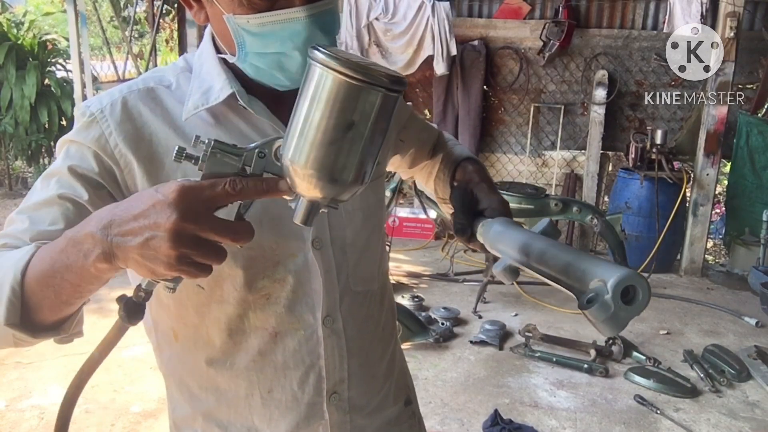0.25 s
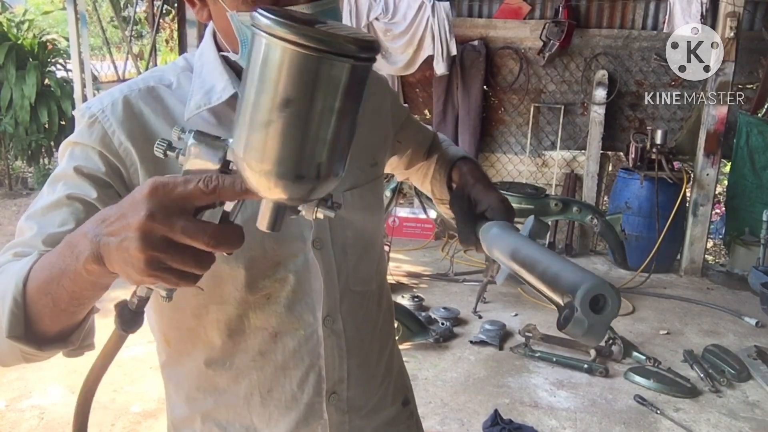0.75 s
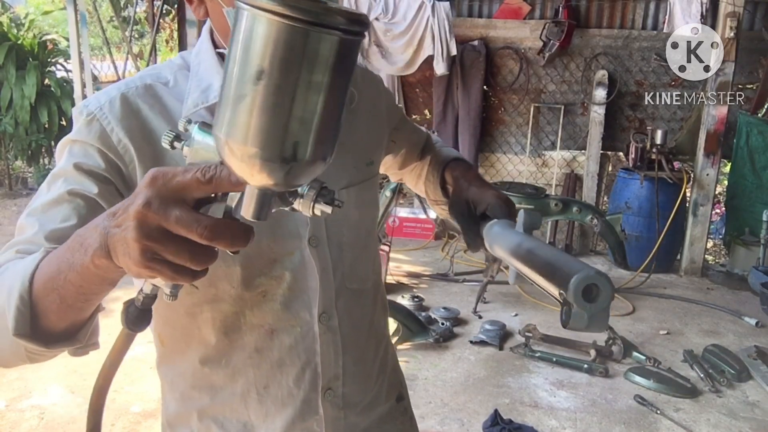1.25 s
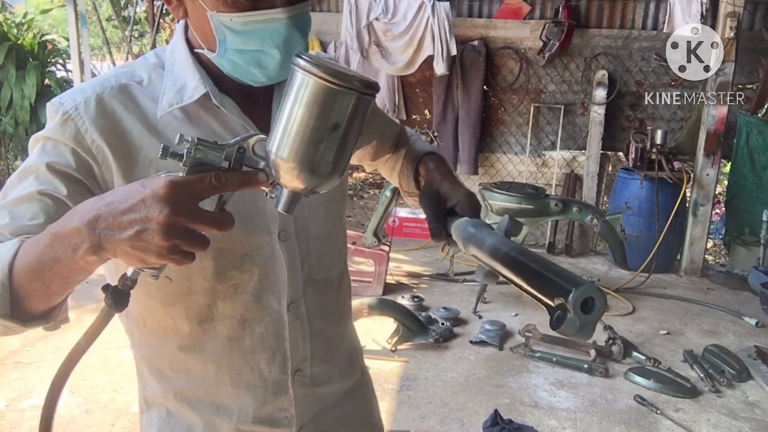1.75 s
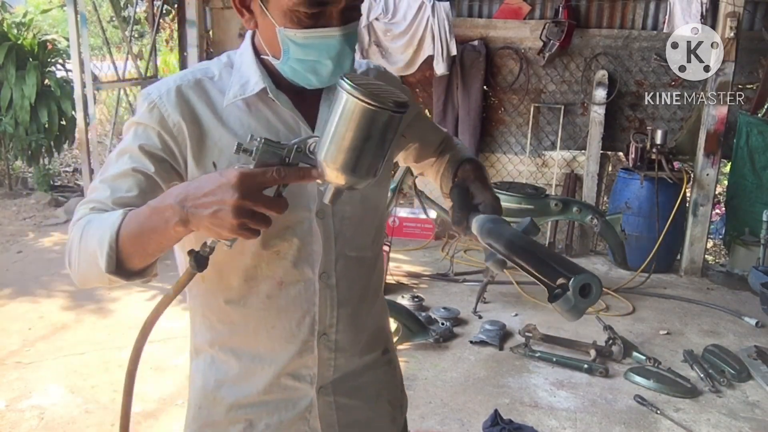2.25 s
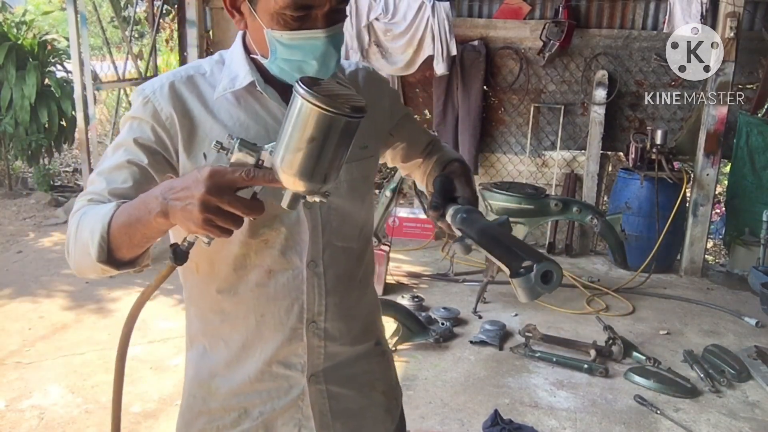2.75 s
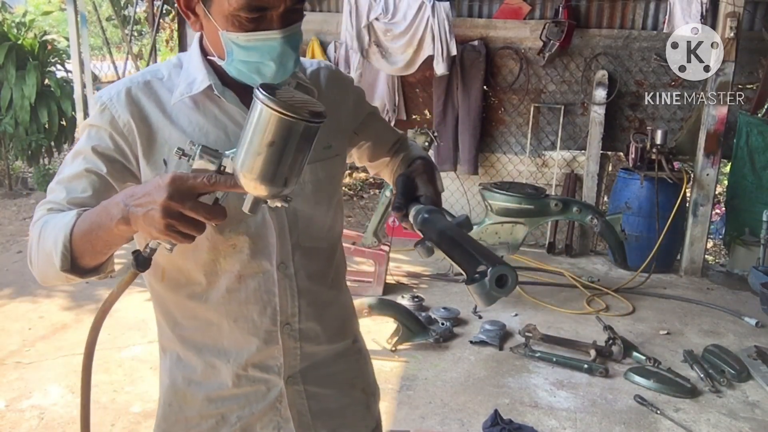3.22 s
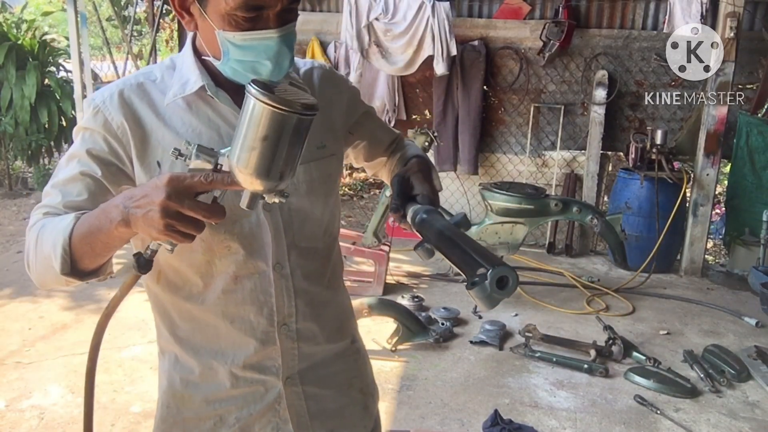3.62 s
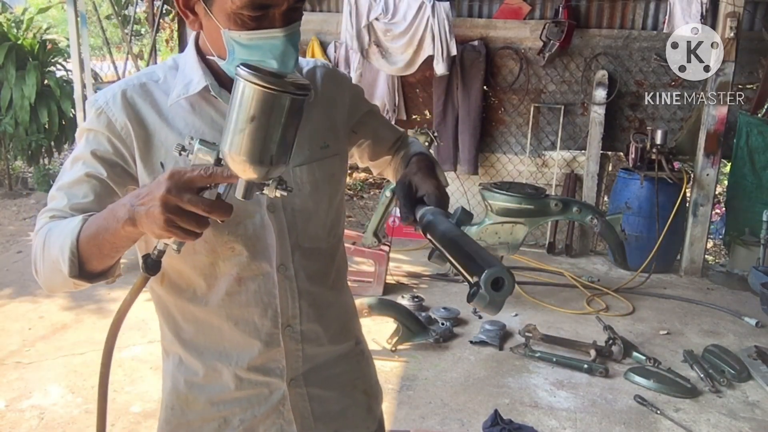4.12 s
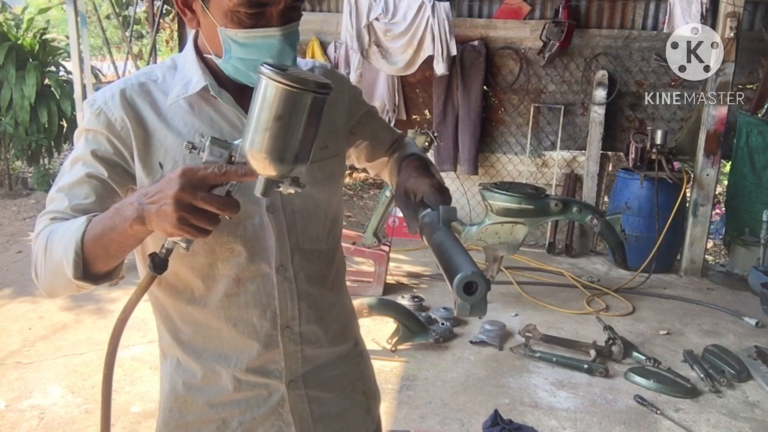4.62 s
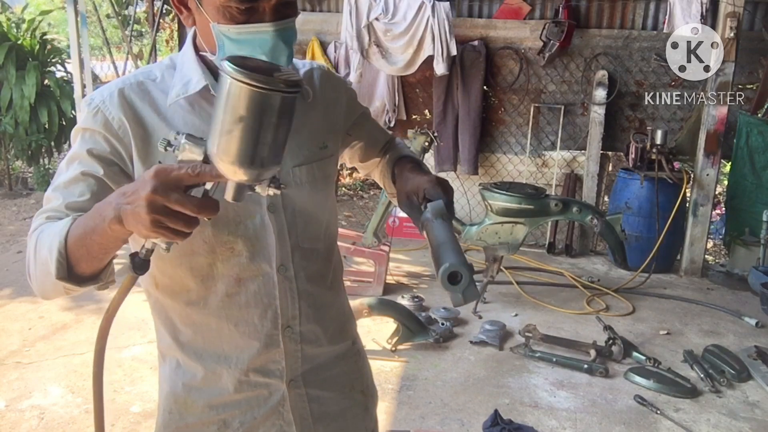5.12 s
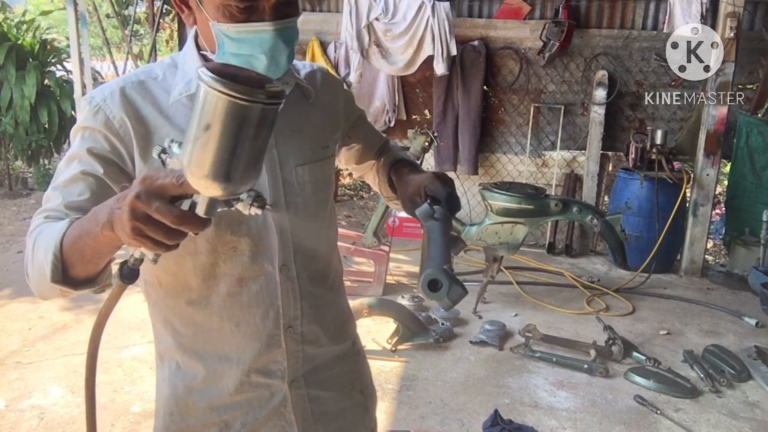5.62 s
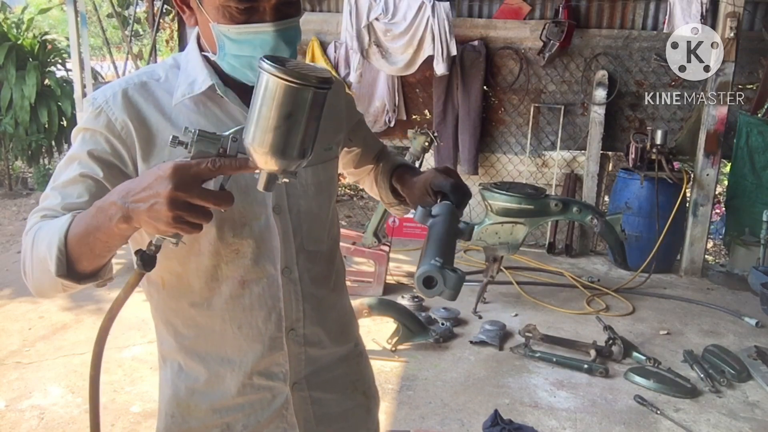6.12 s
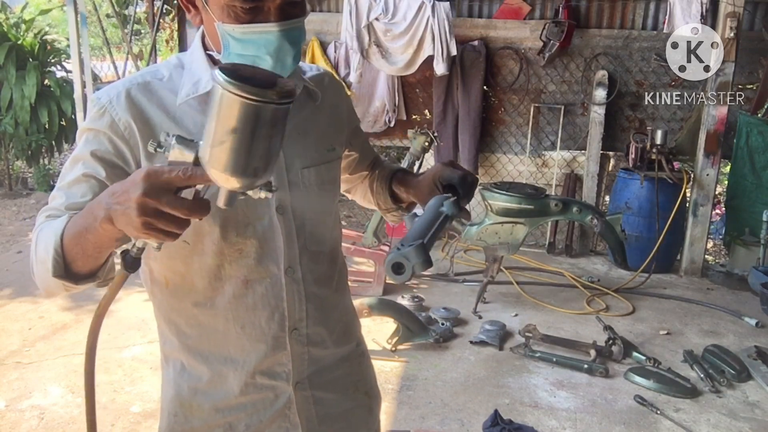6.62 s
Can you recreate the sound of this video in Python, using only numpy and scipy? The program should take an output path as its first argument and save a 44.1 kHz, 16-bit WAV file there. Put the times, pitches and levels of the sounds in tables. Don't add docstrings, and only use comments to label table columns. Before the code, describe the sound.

From 0 to nearly 7 seconds a spray gun blows continuously at arm's length in an open shed: a bright, dense hiss with fine sizzle on top and a coarser roar as the air strikes a metal tube. It is nearest and loudest in the first 1.5 seconds, swelling around 0.6 and 1.2, then eases down by about 2.3 and stays fairly even, with a slight lift near 4.8. Every 0.3 to 0.5 seconds the wrist turns: the top dims gradually and returns quickly, while a lower rush swells. Behind, a piston compressor chugs steadily, about eleven turns a second, each a cluster of uneven hollow knocks ringing pipe, tank and roof. Low mains hum and a wavering belt-guard buzz lie beneath, the buzz jumping near 2.6 and 4.4. Soft gusts thump the microphone, notably at the start, 4.5 and 5.2. It ends still spraying.

```python
import sys
import numpy as np
from scipy import signal
from scipy.fft import rfft, irfft, next_fast_len
from scipy.io import wavfile
from scipy.ndimage import uniform_filter1d

SR = 44100
rng = np.random.default_rng(int(sys.argv[2]) if len(sys.argv) > 2 else 0)


def store_pcm(level_fs):
    pcm = np.round(np.clip(level_fs, -1, 1) * 32767).astype(np.int16)
    wavfile.write(sys.argv[1], SR, np.atleast_2d(pcm).T)


def volts_from_db(level):
    exponent = np.asarray(level, float) / 20
    return 10 ** exponent


N = 302967

# (frequency [Hz], level [dB per Hz])
SHED_COLOUR = [(25, -36), (34, -24), (40, -13), (85, -9), (112, -12.5), (170, -6.5), (255, -14),
               (385, -8.5), (550, -16), (700, -8), (725, -21.5), (900, -26)]
SHED_DB, BREEZE_DB = -38.5, -40
# (time [s], half length [s], level [dB])
BUFFETS = [(.02, 0.066, -29), (.25, 0.13, -35.5), (.75, 0.29, -35), (1.6, 0.066, -41), (2.22, .12, -35),
           (2.702, 0.14, -40), (3.115, .12, -42), (3.45, .1, -43), (4.06, 0.071, -40), (4.53, 0.084, -31),
           (5.247, 0.057, -30), (5.63, 0.08, -34), (6.03, .1, -37)]

MAINS_HZ, MAINS_DB = 100.5, -50
# (time [s], half length [s], level [dB])
BELT_SLAPS = [(.14, 0.035, -46), (0.265, 0.038, -45), (0.64, .03, -42), (0.997, .04, -45),
              (1.31, 0.034, -48), (1.69, 0.088, -45), (2.0, 0.087, -47.5), (2.354, 0.045, -43),
              (2.578, .04, -38), (2.803, 0.11, -48), (3.05, 0.11, -51), (3.246, 0.037, -40),
              (3.523, 0.072, -40.5), (3.777, 0.089, -43), (3.98, .04, -44), (4.394, 0.032, -34),
              (4.562, 0.034, -43), (4.744, 0.055, -44), (5.06, 0.22, -47), (5.28, .07, -41.5),
              (5.48, 0.025, -41), (5.756, 0.18, -43), (6.06, 0.1, -41), (6.253, 0.061, -50),
              (6.5, .04, -42), (6.678, 0.034, -47), (6.83, 0.026, -40)]
GUARD_HZ, GUARD_WAVER_HZ, GUARD_REST_DB = 157, 0.8, -49

# (time [s], speed [turns per second])
CRANK_SPEED = [(0, 11.139), (2.6, 11.141), (3.4, 11.147), (4.9, 11.146), (5.4, 11.156), (6.87, 11.157)]
# (crank angle [turns], strength [dB])
VALVE_KNOCKS = [
    (.0046, -7.3),
    (.1985, 0),
    (.3854, -5.5),
    (.4000, -5),
    (.6490, -15.2),
    (.7827, -11.8),
]
# (frequency [Hz], width [Hz], level [dB])
PIPE_KNOCK = (318, 25, -31.3)
# (frequency [Hz], width [Hz], level [dB])
PIPE_AIR = (328, 46, -42.5)
# (frequency [Hz], width [Hz], knock level [dB],
# air-flow level [dB])
TANK_AND_ROOF = [(191.7, 7.8, -67.5, -90), (234.5, 12, -50, -54), (261.7, 3.4, -67, -50.5),
                 (367.7, 4.4, -47.5, -62), (416, 53, -48.5, -53.5), (517.3, 7.4, -64, -58.5),
                 (675.1, 7.9, -57, -52.5), (685.5, 7.7, -51, -54.5), (701.6, 4, -52, -57),
                 (311.4, 1.5, -78, -51), (622, 26, -56.5, -73), (1060, 9.6, -58, -58)]

# (frequency [Hz], level [dB per Hz])
JET_COLOUR = [(450, -34), (760, -19.5), (977, -12.5), (1040, -11.5), (2100, -6.5), (2910, 1), (4390, 2),
              (4860, -1.5), (5440, 0.5), (6650, 1.5), (7530, -1), (9210, 2), (10400, 2), (12300, 4.5),
              (15200, 2.5)]
# (frequency [Hz], width [Hz], depth [dB])
SHADOWS = [(3670, 750, -2.5), (4860, 190, -2.5), (6080, 290, -3), (7500, 600, -0.5), (10400, 360, -3.5)]
BAND_EDGES = [2150, 7300, 10500]
# (time [s], level [dB])
NEARNESS = [(0.0, -21.0), (0.28, -23.5), (0.57, -20.5), (1.04, -24), (1.22, -20.5), (1.55, -22),
            (1.84, -24.5), (1.9, -23), (2.29, -25), (2.67, -24), (3.03, -25.5), (3.85, -25), (4.35, -25.5),
            (4.75, -24.5), (4.95, -25), (5.55, -25), (6.43, -25.5), (6.87, -25.5)]
# (time [s], half length [s], hiss dimming [dB], sizzle dimming [dB])
WRIST_TURNS = [(0.123, 0.15, 7, 3), (0.5, 0.17, 6, 1.5), (0.889, 0.13, 7.5, 2), (1.216, 0.154, 6.5, 1),
               (1.68, 0.17, 8.5, 5.5), (2.28, 0.133, 6.5, 3.5), (2.536, 0.21, 4.3, 2.5), (2.91, 0.1, 8, 4),
               (3.379, 0.086, 8, 3), (3.82, 0.1, 8.5, 2.5), (4.046, 0.12, 3.5, 1), (4.394, 0.075, 7, 4.0),
               (4.76, 0.23, 5, 2), (4.95, 0.09, 7.5, -1), (5.284, 0.13, 6.5, 4.0), (5.62, 0.17, 7, 1.5),
               (6.032, 0.13, 6.5, 3.5), (6.36, 0.17, 6, 1), (6.753, 0.11, 7.5, 2)]
ARM_LENGTH_ROAR_DB = -25.5
HISS_DB, SIZZLE_DB, RUSH_DB = -30, -25, -39.5
HISS_FOLLOWS, SIZZLE_FOLLOWS, RUSH_FOLLOWS = 0.76, 0.77, 0.63
RUSH_PER_TURN, ROAR_PER_TURN = 0.31, 0.39
FLICK_BACK = 0.54

# (centre time [s], low edge [Hz])
STEREO_PATCHES = [(.253, 14500), (.3, 7600), (.3, 13900), (.416, 9900), (.695, 8300), (.695, 12000),
                  (.718, 6900), (1.345, 14200), (.88, 5000), (.95, 4200), (1.182, 4100), (1.345, 4300),
                  (1.345, 8300), (1.856, 6900), (1.925, 6200), (2.273, 4100), (2.273, 7600), (2.413, 5000),
                  (2.738, 8200), (2.924, 7900), (2.924, 11000), (3.597, 8100), (3.922, 6200), (4.038, 6500),
                  (4.061, 11800), (4.224, 7600), (4.549, 11700), (5.13, 10600), (4.073, 14200),
                  (5.64, 7900)]
PATCH_WIDTH_HZ, TOP_HZ = 1700, 15720


def level(x, db):
    return x * volts_from_db(db) / np.sqrt(np.mean(x ** 2))


def curve(rows):
    s, *columns = np.transpose(rows)
    return [np.interp(np.arange(N) / SR, s, c) for c in columns]


def shaped(x, gain):
    size = next_fast_len(N + SR)
    hz = np.arange(1, size // 2 + 2) * SR / size
    return irfft(rfft(x, size) * gain(hz), size)[:N]


def colour(points, hz):
    f, db = np.transpose(points)
    return volts_from_db(np.interp(np.log(hz), np.log(f), db, left=-80, right=db[-1]))


def ring(hz, centre_hz, width_hz):
    return (1 + 1j * (hz / centre_hz - centre_hz / hz) * centre_hz / width_hz) ** -2


def rung(x, centre_hz, width_hz, db):
    return level(shaped(x, lambda hz: ring(hz, centre_hz, width_hz)), db)


def walk(rate):
    hold = int(SR / rate)
    steps = rng.standard_normal(N // 200)[:N // hold + 1]
    wander = np.repeat(steps, hold)
    wander = uniform_filter1d(uniform_filter1d(wander, hold), hold)[:N]
    return wander / wander.std()


def swells(s, half_s, size, back=1):
    t = np.arange(0, N + 64, 64) / SR
    since = t - s[:, None]
    side = np.where(since > 0, back, 1)
    bells = np.exp(-(since / half_s[:, None] / side) ** 2)
    return np.interp(np.arange(N) / SR, t, size @ bells)


def shed():
    rumble = shaped(rng.standard_normal(N), lambda hz: colour(SHED_COLOUR, hz))
    wind = shaped(rng.standard_normal(N), lambda hz: ring(hz, 87, 103) / (1 + (42 / hz) ** 12))
    s, half_s, db = np.transpose(BUFFETS)
    gusts = volts_from_db(BREEZE_DB) + swells(s, half_s, volts_from_db(db))
    return level(rumble, SHED_DB) * volts_from_db(0.5 * walk(3.03)) + level(wind, -10.5) * gusts


def motor():
    s, half_s, db = np.transpose(BELT_SLAPS)
    buzz = volts_from_db(GUARD_REST_DB) + swells(s, half_s, volts_from_db(db))
    hum = np.sin(2 * np.pi * MAINS_HZ * np.arange(N) / SR) * volts_from_db(MAINS_DB + 0.56 * walk(2.5))
    guard_hz = GUARD_HZ + GUARD_WAVER_HZ * walk(6.5)
    guard = np.sin(2 * np.pi * np.cumsum(guard_hz) / SR) * buzz * volts_from_db(walk(4))
    return np.sqrt(2) * (hum + guard)


def valve_knocks():
    turn = 0.01 + np.cumsum(curve(CRANK_SPEED)[0]) / SR
    angle, db = np.transpose(VALVE_KNOCKS)
    whole = np.arange(int(turn[-1]) + 1)[:, None]
    jitter_s, jitter_db = 0.00004 * rng.standard_normal((2, len(whole), len(angle)))
    jitter_db = jitter_db / 0.00004 * 0.8
    at = np.interp(whole + angle, turn, np.arange(N)) + jitter_s * SR
    strength = volts_from_db(db + jitter_db) * (whole + angle < turn[-1])
    knocks = np.zeros(N)
    np.add.at(knocks, np.clip(at, 0, N - 1).astype(int), strength)
    return knocks * volts_from_db(0.7 * walk(3))


def compressor():
    knocks = valve_knocks()
    swell = signal.lfilter([1], [1, -np.exp(-1 / (0.012 * SR))], knocks)
    flow = rng.standard_normal(N) * (1 + 0.5 * swell / swell.mean())
    sound = rung(knocks, *PIPE_KNOCK) + rung(flow, *PIPE_AIR)
    for hz, width_hz, knock_db, flow_db in TANK_AND_ROOF:
        sound += rung(knocks, hz, width_hz, knock_db) + rung(flow, hz, width_hz, flow_db)
    return sound


def glints(x, depth_db, wide, long):
    cells = signal.stft(x, nperseg=512)[2]
    field = uniform_filter1d(rng.standard_normal(cells.shape), wide, axis=0)
    field = uniform_filter1d(field, long, axis=1)
    return signal.istft(cells * volts_from_db(depth_db * field / field.std()), nperseg=512)[1][:N]


def sweep():
    level_db, = curve(NEARNESS)
    s, half_s, hiss_dims, sizzle_dims = np.transpose(WRIST_TURNS)
    near = level_db - ARM_LENGTH_ROAR_DB
    hiss_dip = swells(s, half_s, hiss_dims, FLICK_BACK)
    sizzle_dip = swells(s, half_s, sizzle_dims, FLICK_BACK)
    rush_db = RUSH_DB + RUSH_FOLLOWS * near + RUSH_PER_TURN * hiss_dip
    roar_db = level_db - ROAR_PER_TURN * sizzle_dip
    hiss_db = HISS_DB + HISS_FOLLOWS * near - hiss_dip
    sizzle_db = SIZZLE_DB + SIZZLE_FOLLOWS * near - sizzle_dip
    return rush_db, roar_db, hiss_db, sizzle_db


def jet_body(hz):
    shadow_db = sum(db * np.exp(-((hz - f) / w) ** 2) for f, w, db in SHADOWS)
    return colour(JET_COLOUR, hz) * volts_from_db(shadow_db)


def gun():
    rush_db, roar_db, hiss_db, sizzle_db = sweep()
    air = glints(rng.standard_normal(N), 1.3, wide=3, long=10)
    low, mid, high = [shaped(air, lambda hz: jet_body(hz) / (1 + (hz / edge) ** 12)) for edge in BAND_EDGES]
    eddies = walk(25.26)
    rush = level(low, 0.15) * volts_from_db(rush_db)
    roar = level(mid - low, 0.033) * volts_from_db(roar_db + 0.11 * eddies)
    hiss = level(high - mid, 0.17) * volts_from_db(hiss_db + 0.6 * eddies + 0.5 * walk(30))
    sizzle = level(shaped(air, jet_body) - high, 0.57) * volts_from_db(sizzle_db + 0.53 * eddies)
    return rush + roar + hiss + sizzle


def scene():
    return np.tile(shed() + motor() + compressor() + gun(), (2, 1))


def low_pass(x):
    return signal.sosfilt(signal.butter(12, 17060, fs=SR, output="sos"), x)


def record(dry):
    out = np.array([shaped(c, lambda hz: hz < TOP_HZ) for c in dry])
    half = 1024
    hz = np.arange(half + 1) * SR / (2 * half)
    fade = np.sqrt(np.hanning(2 * half))
    for s, low_hz in STEREO_PATCHES:
        i = int(s * SR)
        band = (hz > low_hz) * (hz < low_hz + PATCH_WIDTH_HZ)
        change = out[0, i - 3 * half:i - half] - out[0, i - half:i + half]
        out[1, i - half:i + half] += irfft(rfft(change) * band) * fade
    return low_pass(out)


dry = scene()
out = record(dry)
store_pcm(out)
```